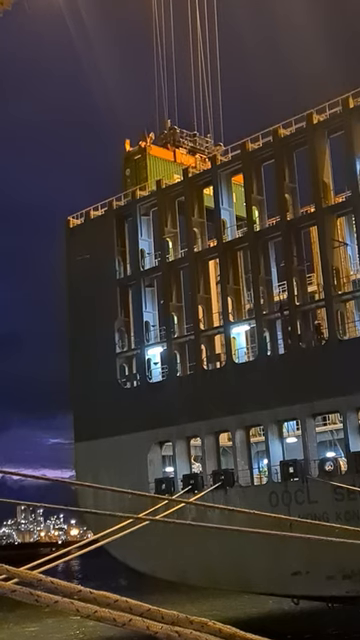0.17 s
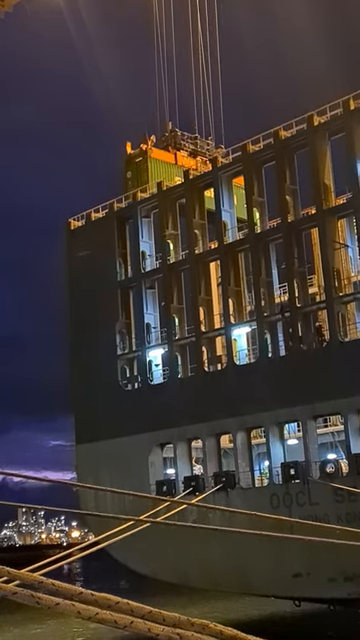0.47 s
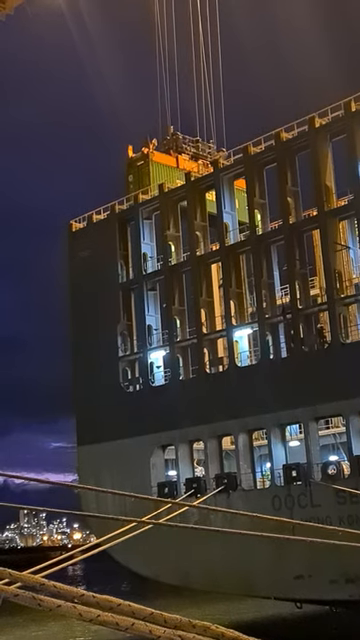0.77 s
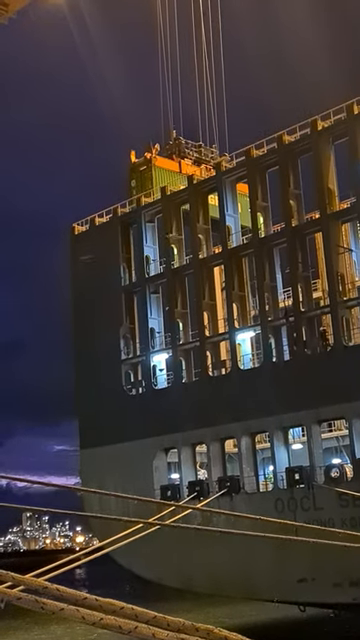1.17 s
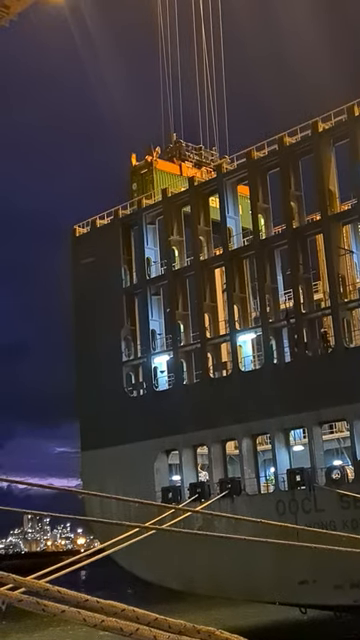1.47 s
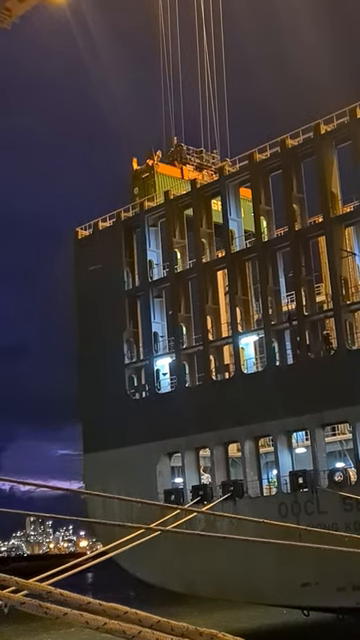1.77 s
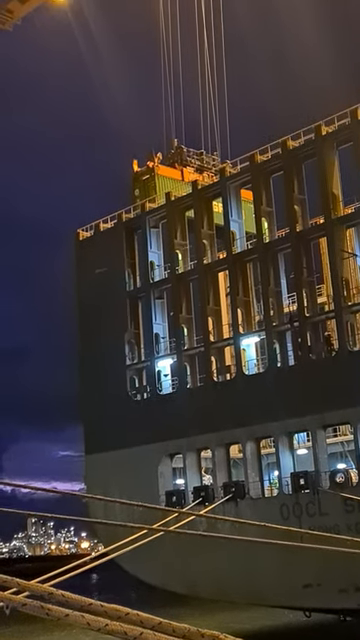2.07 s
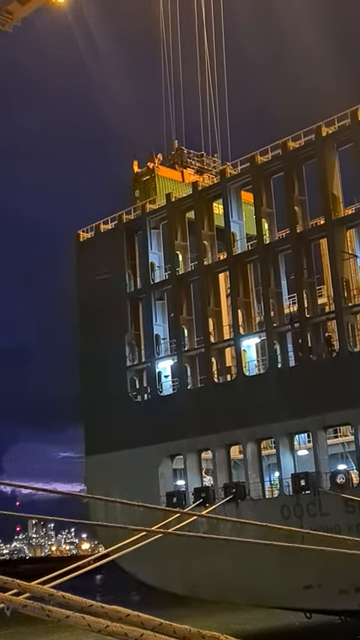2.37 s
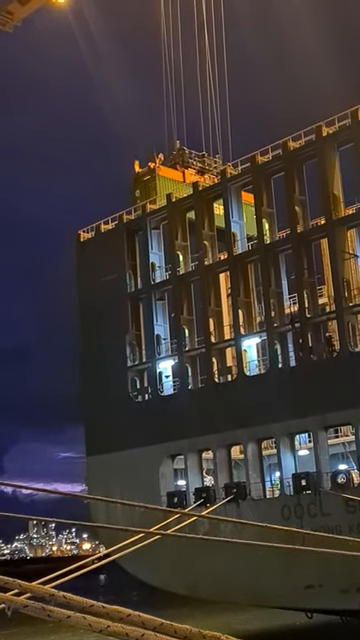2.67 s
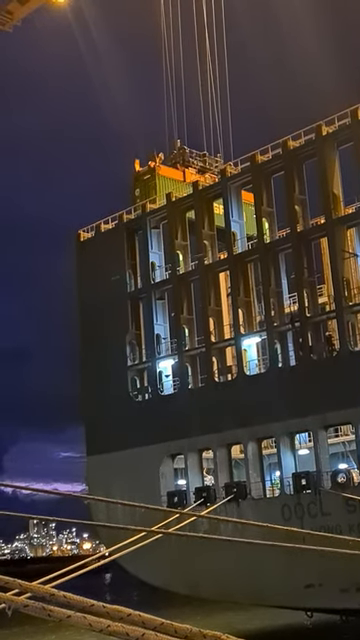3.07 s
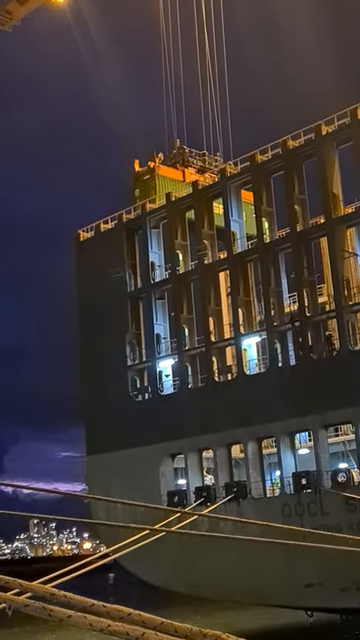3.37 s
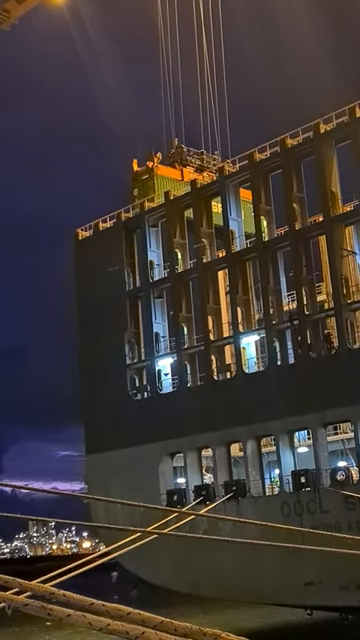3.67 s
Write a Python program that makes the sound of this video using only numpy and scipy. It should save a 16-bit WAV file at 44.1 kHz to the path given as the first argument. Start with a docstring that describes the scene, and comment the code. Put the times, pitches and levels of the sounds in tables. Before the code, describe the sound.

A container bangs and rattles into a ship over a steady low engine rumble.

```python
"""Night on a container quay, from a stereo microphone across the water on a moored ship's stern.
Ship engines and generators rumble, drone and roar throughout. From 0.5 s a crane lowers a steel box
into its guides: a few soft thuds, a squeal of rubbing steel, then heavy landings that push the air
near 1.5 s and 2.5 s. One more comes at 3.2 s and the rattling thins out, each blow rolling back
off hull and stacks."""
import sys
import numpy as np
from scipy import signal
from scipy.fft import rfft, irfft, next_fast_len
from scipy.io import wavfile

SR = 44100
rng = np.random.default_rng(int(sys.argv[2]) if len(sys.argv) > 2 else 0)


def waveform_to_disk(signal):
    """Save audio, clipped to [-1, 1], as 16-bit WAV at the path in sys.argv[1]."""
    frames = np.transpose(np.atleast_2d(signal))
    scaled = np.clip(frames, -1, 1) * 32767
    samples = np.round(scaled).astype(np.int16)
    wavfile.write(sys.argv[1], SR, samples)


N = 168021

# swell of the deep rumble at the stern: t/s, level/dB
RUMBLE_SWELL = [(0.1, -17), (0.12, -20.5), (0.84, -22), (0.88, -19.5), (1.03, -33), (1.32, -19),
                (1.48, -21.5), (1.5, -17.5), (1.99, -33), (2.07, -16.5), (2.38, -23.5), (2.5, -19),
                (2.61, -23.5), (2.7, -18.5), (2.83, -20), (2.88, -28), (3.18, -22.5), (3.21, -26),
                (3.24, -16.5), (3.44, -25.5), (3.53, -18), (3.81, -30)]
# engine-room resonances: f/Hz, width/Hz, relative level/dB
ENGINE_RESONANCES = [(41, 5.6, -18.5), (53.9, 6, -1), (80.5, 5.1, -9)]
# low drone of machinery and box boom, swelling with each heavy landing: t/s, level/dB
DRONE_AND_BOOM = [(0.25, -29.5), (0.27, -29), (0.54, -28.5), (0.95, -29.5), (0.97, -36.5), (1.21, -27.5),
                  (1.46, -26.5), (1.51, -20), (1.82, -28), (1.88, -25.5), (2.33, -24.5), (2.51, -18),
                  (2.85, -23), (2.94, -31), (3.26, -22), (3.45, -25.5), (3.49, -23), (3.81, -34.5)]
# spectrum of that drone and boom: f/Hz, relative level/dB
DRONE_SPECTRUM = [(80, -24), (110, -9), (140, -6), (200, 1.5), (230, -4), (263, 1), (310, -7), (420, -12.5),
                  (600, -33)]
# spectrum of the harbour's roar from across the water: f/Hz, relative level/dB
ROAR_SPECTRUM = [(200, -10.5), (400, 1.5), (500, 1), (600, 1), (800, -1), (920, -4), (1200, 0.5),
                 (1450, -2), (1700, -11.5), (1950, -6), (2400, -18), (3100, -16), (3500, -20.5),
                 (4500, -26), (4950, -22.5), (5300, -29), (6000, -32.5), (7000, -41.5), (8000, -52.5),
                 (9000, -56.5)]
# faint generator tones: f/Hz, level/dB
GENERATOR_TONES = [(253, -46), (268, -47), (538, -50), (1190, -56), (1915, -57), (2837, -66), (4047, -71)]
# box hitting its guides: t/s, level/dB, boom/dB, brightness/(dB per octave), attack/s, t60 at 1 kHz/s
BOX_BLOWS = [(.500, -35, 11, -9, .006, 0.14), (0.683, -46, -1, 10, 0.0078, 0.22),
             (1.177, -51, 15, -10, 0.0068, 0.37), (1.298, -50, -0.5, 3.5, .01, .4),
             (1.487, -27, 4.5, -5.5, 0.0052, 0.56), (1.502, -29, 10, 1.5, 0.005, 1),
             (1.545, -25, 3, 0.5, 0.0072, 0.62), (1.576, -28, 6.5, -4, 0.0066, 0.39),
             (1.615, -27, 10, 2.5, 0.0074, 0.29), (1.630, -32.5, 6.5, 4, .005, 0.25),
             (1.649, -28.5, -5.5, 3.5, 0.018, 1), (1.883, -34, 18, -11, 0.0072, 0.4),
             (1.993, -29.5, 9.5, -5, 0.005, 0.37), (2.130, -27.5, 2, -1.5, 0.0076, 0.72),
             (2.133, -43.5, -8, 9.5, 0.0078, 0.44), (2.334, -34.5, -8.5, 12, .03, 0.33),
             (2.370, -17.5, -9.5, 2.5, 0.0073, 0.66), (2.372, -25.5, -14.5, 6, 0.0033, 0.14),
             (2.384, -22, -10.5, 0, 0.0046, .25), (2.440, -22, -1.5, -0.5, 0.0062, 0.55),
             (2.476, -28.5, 9, 3, 0.012, 1), (2.503, -25.5, -1, 4.5, .005, 0.46),
             (2.538, -23.5, 4.5, 2.5, 0.005, 0.66), (2.583, -24.5, 0.5, -0.5, 0.0048, 1),
             (2.656, -33, 15.5, -0.5, 0.012, 0.79), (2.690, -37, 21, 6.5, 0.0047, 0.42),
             (2.728, -26, 5.5, -4, 0.0053, 0.61), (2.799, -33, 4.5, 1, 0.0089, 1),
             (2.844, -30.5, -3, -8, 0.0072, 0.09), (3.025, -32.5, 9, -4.5, 0.0056, 1),
             (3.170, -27.5, 4, 1.5, 0.018, 0.53), (3.224, -26, 1.5, -0.5, .02, 0.81),
             (3.300, -34.5, 13, -10, .015, 0.79), (3.391, -37.5, 17.5, 2.5, 0.011, 0.23),
             (3.455, -28, 10.5, 3, 0.034, 0.53), (3.738, -61, -4, -11, 0.0068, 0.1),
             (3.772, -49, 16, 11, 0.013, 0.21)]
# spectrum of the clatter after a blow: f/Hz, relative level/dB
CLATTER_SPECTRUM = [(25, -20), (40, -4), (70, 5), (130, -12), (210, -11), (300, 4.5), (400, -1), (480, -1),
                    (580, 0), (680, 4), (800, 5.5), (900, 1.5), (1000, 3), (1250, -1), (1450, 2.5),
                    (1650, -6.5), (2000, -4), (2600, -13), (3200, -17.5), (4200, -26.5), (6000, -39),
                    (7000, -47.5), (8500, -68), (10000, -65), (15000, -73)]
# modes of the steel box: f/Hz, relative level/dB, t60/s
BOX_MODES = [(68.4, 3.5, 0.27), (115.5, 0, .3), (210.6, 3.5, 0.14), (303.7, 2, 0.13), (365.2, -3.5, 0.22),
             (425.7, -5, .2), (589, -5.5, 0.28), (685, -15, 0.08), (831, -7.5, 0.082), (996, -5.5, 0.2),
             (1198, -10.5, 0.13), (1383, -5, 0.17), (1447, -3.5, 0.12), (1926, -5.5, 0.17),
             (2320, -8.5, .08), (2660, -9, 0.067), (2806, -9.5, .1), (3206, -13.5, 0.056),
             (4037, -21.5, .07)]
# squeals of rubbing steel: t/s, length/s, f/Hz, peak level/dB
STEEL_SQUEALS = [(1.062, .08, 1190, -35), (1.664, .026, 3225, -43), (1.690, .02, 3190, -48),
                 (1.681, .022, 6150, -62), (1.738, .02, 7200, -69)]
# air pushed by heavy landings: t/s, peak level/dB, f/Hz, length/cycles
AIR_PUSHES = [(1.497, -11, 118, 2), (1.502, -13.5, 298, 6.9), (1.516, -11, 212.7, 11),
              (1.519, -17, 55.6, 1.2), (1.533, -11.5, 109.6, 2), (1.571, -17.5, 204, 3.2),
              (1.585, -14, 312, 5.5), (1.612, -16, 234, 6.4), (1.628, -16.5, 131, 3),
              (2.477, -12.5, 58.6, 3.3), (2.515, -14.5, 331, 7.8), (2.560, -14, 310, 9),
              (2.745, -17.5, 347, 12), (2.838, -13.5, 116.5, 4.5), (3.233, -8, 61.2, 2.3)]
# left-right coherence at the microphone: f/Hz, of the harbour, of the blows
MIC_COHERENCE = [(50, 0.75, 0.84), (168, 0.86, 0.46), (298, 0.92, 1), (520, 0.4, 0.91), (700, 0.5, .8),
                 (980, .3, 0.4), (1400, 0.62, 0.36), (1570, 0.63, .4), (1852, 0.29, 0.72),
                 (2450, 0.63, 0.75), (2900, 0.12, 0.16), (16000, .2, .2)]
# phase lead of the microphone's left side: f/Hz, for the harbour/rad, for the blows/rad
MIC_PHASE_LEAD = [(50, 0, 0), (780, -0.07, -0.35), (1400, 2, -.5), (1570, 2.5, -2.5), (1850, 2.5, -3),
                  (2580, 0, -2.5), (2750, 0.05, -3.5), (4115, -4.5, -11), (16000, -3.1, -9.5)]
# mismatch of the microphone's two sides: f/Hz, left minus right/dB
MIC_MISMATCH = [(50, 2.5), (200, 2.2), (330, 0), (500, 3), (700, 0), (1000, -2), (1400, -4), (1700, -1),
                (2000, -3), (2700, 3), (3200, -1), (4500, 1), (6000, 7), (8000, 12), (9000, -6),
                (10000, -1), (12000, -7), (16000, -8)]
# spectrum of the microphone's own hiss: f/Hz, relative level/dB
MIC_HISS_SPECTRUM = [(6000, -32), (9000, -21.5), (10000, -5), (12000, -5), (16000, -3)]

HARBOUR, BLOWS = 1, 2   # columns of MIC_COHERENCE and MIC_PHASE_LEAD
LEFT_RIGHT = np.array([[1], [-1]])
TIME, FFT_SIZE = np.arange(N) / SR, next_fast_len(N)
FREQS = np.arange(FFT_SIZE // 2 + 1) * SR / FFT_SIZE


def from_db(db):
    """Decibels to gain."""
    return 10 ** (np.asarray(db) / 20)


def swell(table):
    """Gain at every sample from rows of t/s, level/dB."""
    return from_db(np.interp(TIME, *np.transpose(table)))


def at_hz(table, hz, column=1):
    """Read a column of a table on a log-frequency axis."""
    rows = np.array(table)
    return np.interp(np.log(hz + 1), np.log(rows[:, 0]), rows[:, column])


def drift(rate_hz):
    """Random wander of spread 1, mostly slower than rate_hz."""
    hop, settle = 40, 2000
    pole = np.exp(-2 * np.pi * rate_hz * hop / SR)
    white = rng.standard_normal(N // hop + settle + 2)
    slow = signal.lfilter([1], [1, -2 * pole, pole ** 2], white)[settle:]
    return np.interp(np.arange(N) / hop, np.arange(len(slow)), (slow - slow.mean()) / slow.std())


def stereo_noise(gain, source):
    """Spectrum of noise of rms 1, with the source's coherence and phase lead at the microphone."""
    alike = np.clip(at_hz(MIC_COHERENCE, FREQS, source), 0, 1)
    mid, side = rfft(rng.standard_normal((2, FFT_SIZE)))
    pair = gain * (np.sqrt(1 + alike) * mid + np.sqrt(1 - alike) * side * LEFT_RIGHT)
    pair *= np.exp(.5j * at_hz(MIC_PHASE_LEAD, FREQS, source) * LEFT_RIGHT)
    return pair / np.sqrt(np.mean(irfft(pair, FFT_SIZE) ** 2))


def in_bands(spectrum, envelope, low_hz, high_hz):
    """Sum overlapping half-octave bands of a noise, each under its own envelope."""
    out = 0
    for centre in low_hz * 2 ** np.arange(0, np.log2(high_hz / low_hz) + .5, .5):
        share = np.cos(np.pi * np.clip(np.log2((FREQS + 1) / centre), -.5, .5)) ** 2
        out += irfft(spectrum * share, FFT_SIZE)[:, :N] * envelope(centre)
    return out


def noise_bed(table, flicker_db, low_hz, high_hz):
    """Continuous noise whose bands flicker, partly together."""
    together = .5 * drift(2.6)
    noise = stereo_noise(from_db(at_hz(table, FREQS)), HARBOUR)
    return in_bands(noise, lambda hz: from_db(flicker_db * (together + drift(19))), low_hz, high_hz)


def engine_rumble():
    """Ship engines: deep noise in narrow engine-room resonances over a broad hump."""
    peaks = sum(from_db(db) / (1 + (2 * (FREQS - hz) / width) ** 2)
                for hz, width, db in ENGINE_RESONANCES)
    hump = from_db(-1) / (1 + (FREQS / 95) ** 8) / (1 + (31 / (FREQS + 1)) ** 6)   # 31 to 95 Hz
    return swell(RUMBLE_SWELL) * irfft(stereo_noise(peaks + hump, HARBOUR), FFT_SIZE)[:, :N]


def drone_and_roar():
    """Low drone of machinery and box boom, swelling with each heavy landing, and the harbour's roar."""
    drone = noise_bed(DRONE_SPECTRUM, flicker_db=1.0, low_hz=73.5, high_hz=600)
    roar = noise_bed(ROAR_SPECTRUM, flicker_db=1.23, low_hz=197, high_hz=9480)
    return swell(DRONE_AND_BOOM) * drone + from_db(-32.5) * roar


def generator_hum(waver_db=4.1, waver_rad=3.0):
    """Generators: faint tones that waver in level and phase."""
    return sum(from_db(db + waver_db * drift(8.2)) * np.sin(2 * np.pi * hz * TIME + waver_rad * drift(2.7))
               for hz, db in GENERATOR_TONES)


def blow_colour_db(hz, boom_db, brightness):
    """A blow's emphasis: a flat boom below 420 Hz, above it a tilt about 1 kHz."""
    return boom_db if hz < 420 else brightness * np.log2(hz / 1000)


def box_clatter():
    """Steel hits steel on the quay: bursts of noise that roll away, the treble dying first."""
    def envelope(hz):
        power = np.zeros(N)
        for onset, db, boom_db, brightness, attack, t60 in BOX_BLOWS:
            start = int(onset * SR)
            t = np.arange(min(N - start, SR)) / SR
            band_t60 = t60 * (hz / 1000) ** -.23
            level_db = db + blow_colour_db(hz, boom_db, brightness) - 60 * t / band_t60
            rise = 1 - np.exp(-(t / attack) ** 2)
            power[start:start + len(t)] += (rise * from_db(level_db)) ** 2
        return np.sqrt(power)
    noise = stereo_noise(from_db(at_hz(CLATTER_SPECTRUM, FREQS)), BLOWS)
    return in_bands(noise, envelope, low_hz=37.13, high_hz=13000)


def box_ring(hard_blow_db=-22, scatter_db=2.0, detune=.01):
    """The box's modes ring; each blow lands elsewhere, scattering their level and pitch."""
    out = np.zeros((2, N))
    for onset, db, boom_db, brightness, attack, _ in BOX_BLOWS:
        start = int(onset * SR)
        ring_db = db - 1 + .4 * (db - hard_blow_db)   # harder blows ring more
        for hz, mode_db, t60 in BOX_MODES:
            louder, higher = rng.standard_normal(2)
            t = np.arange(min(N - start, int(t60 * SR))) / SR
            rise = np.sin(.5 * np.pi * np.clip(t / (2 * attack), 0, 1)) ** 2
            level_db = ring_db + mode_db + blow_colour_db(hz, boom_db, brightness) + scatter_db * louder
            lead = .5 * at_hz(MIC_PHASE_LEAD, hz, BLOWS) * LEFT_RIGHT
            tone = np.sin(2 * np.pi * hz * (1 + detune * higher) * t + lead)
            out[:, start:start + len(t)] += rise * from_db(level_db - 60 * t / t60) * tone
    return out


def steel_squeals(waver_hz=10):
    """Steel rubs on steel: brief wavering tones that swell and fade."""
    out = np.zeros(N)
    for onset, length, hz, db in STEEL_SQUEALS:
        start = int(onset * SR)
        t = np.arange(int(length * SR)) / SR
        wobble = np.cumsum(waver_hz * drift(39)[:len(t)]) / SR
        tone = np.sin(2 * np.pi * (hz * t + wobble))
        out[start:start + len(t)] += from_db(db) * np.sin(np.pi * t / length) * tone
    return out


def air_pushes():
    """Heavy landings push the air: a few cycles of deep pressure, swelling and dying."""
    out = np.zeros(N)
    for onset, db, hz, cycles in AIR_PUSHES:
        start = int(onset * SR)
        turns = np.arange(int(cycles / hz * SR)) * hz / SR
        window = np.sin(np.pi * turns / cycles) ** 2
        out[start:start + len(turns)] += from_db(db) * window * np.cos(2 * np.pi * turns)
    return out


def scene():
    """The quay as heard from the stern, the box slightly to the right."""
    harbour = engine_rumble() + drone_and_roar() + generator_hum()
    box = (box_clatter() + box_ring()) * from_db(-.25 * LEFT_RIGHT)
    return harbour + box + steel_squeals() + air_pushes()


def record(dry, opens_s=.0789, cutoff_hz=15900):
    """The microphone: faint hiss, unequal sides, quick fades in and out, a steep cut at the top."""
    x = dry + from_db(-71) * noise_bed(MIC_HISS_SPECTRUM, flicker_db=0, low_hz=8000, high_hz=15640)
    hz = np.arange(N + 1) * SR / (2 * N)
    mismatch = from_db(at_hz(MIC_MISMATCH, hz) / 2 * LEFT_RIGHT)
    mirrored = np.hstack([x, x[:, ::-1]])   # keeps the end from wrapping into the start
    x = irfft(rfft(mirrored) * mismatch)[:, :N]
    fade_in = np.clip((TIME - opens_s) / .0006, 0, 1)
    fade_out = np.clip(TIME[::-1] / .004, 0, 1)
    lowpass = signal.cheby2(24, 70, cutoff_hz, fs=SR, output="sos")
    return signal.sosfilt(lowpass, x * fade_in * fade_out)


dry = scene()
out = record(dry)
waveform_to_disk(out)
```